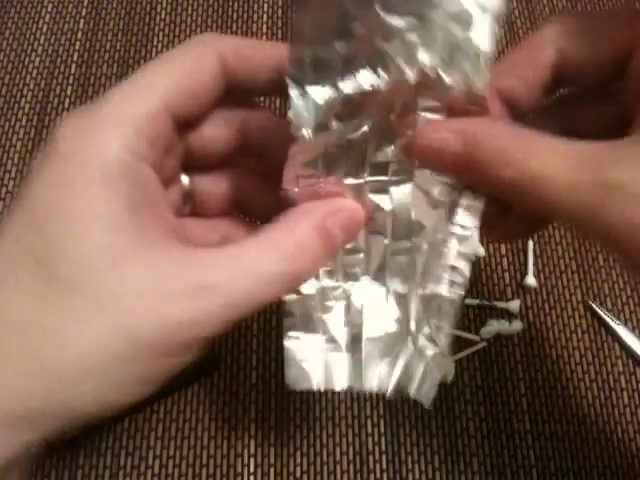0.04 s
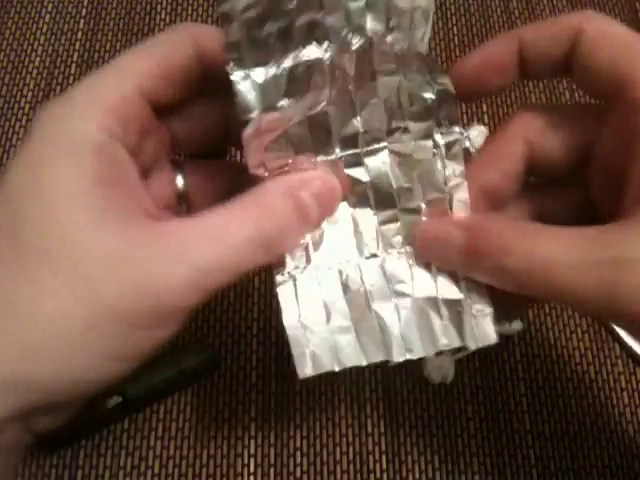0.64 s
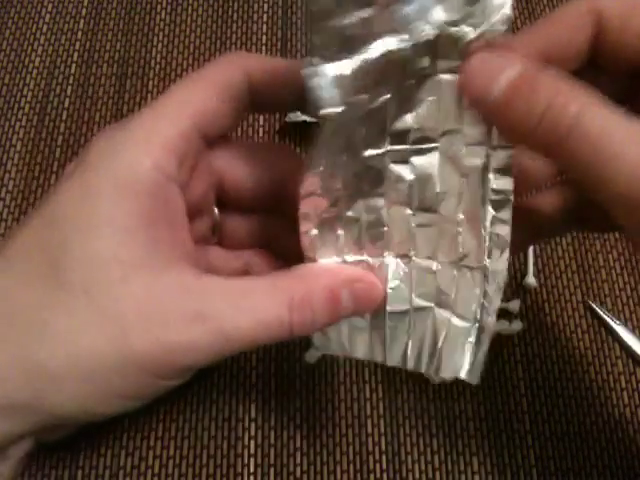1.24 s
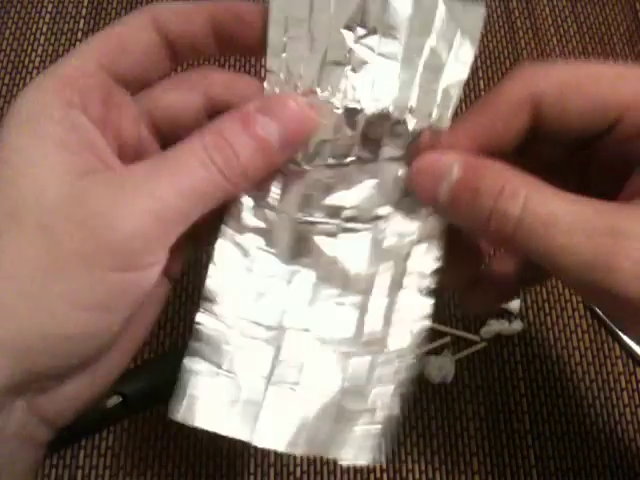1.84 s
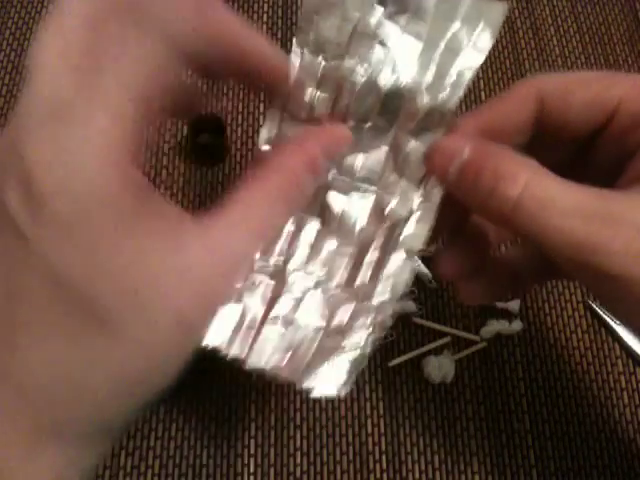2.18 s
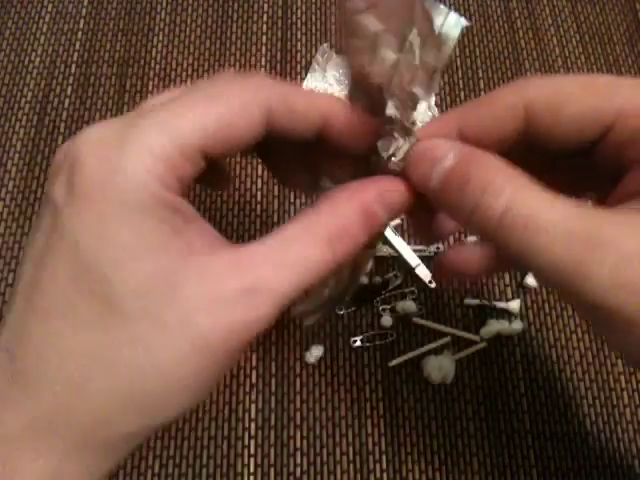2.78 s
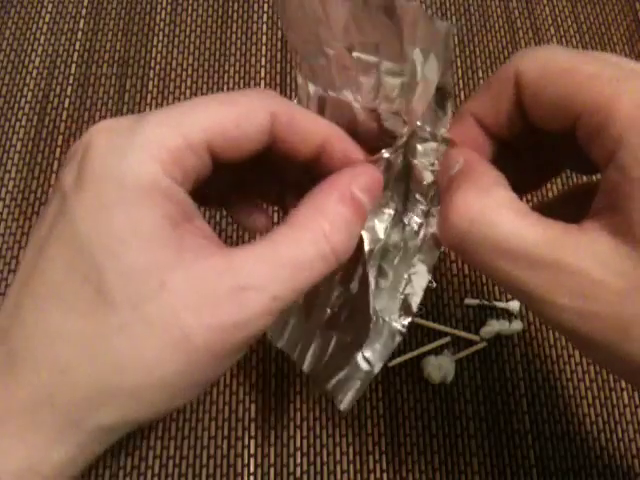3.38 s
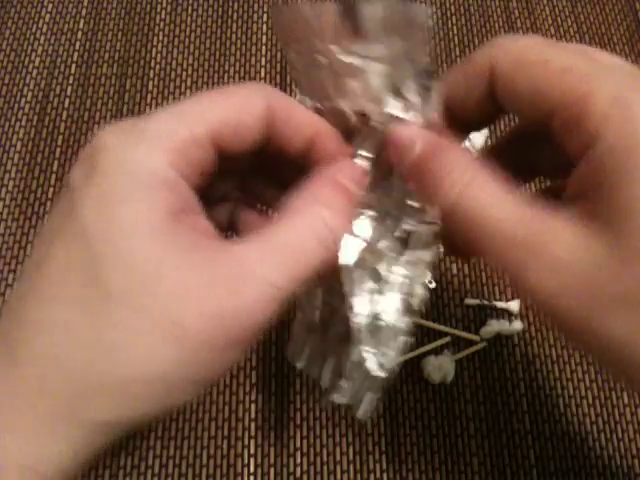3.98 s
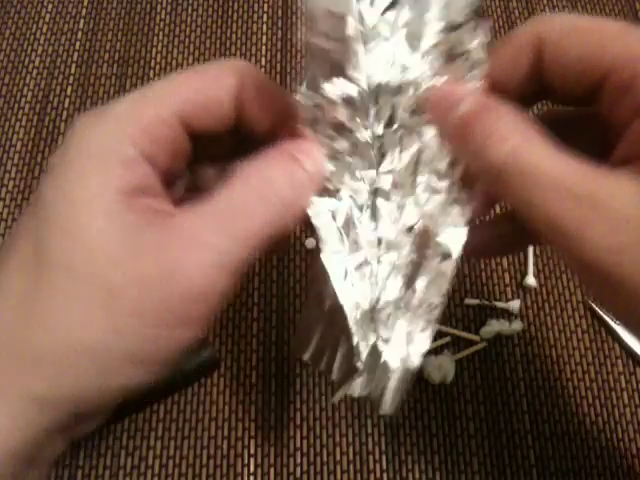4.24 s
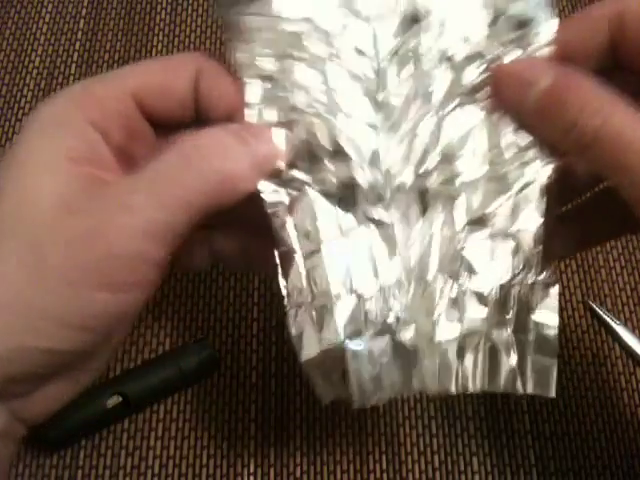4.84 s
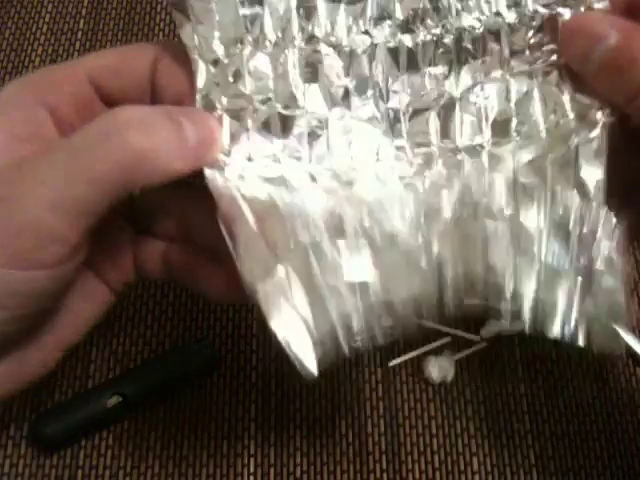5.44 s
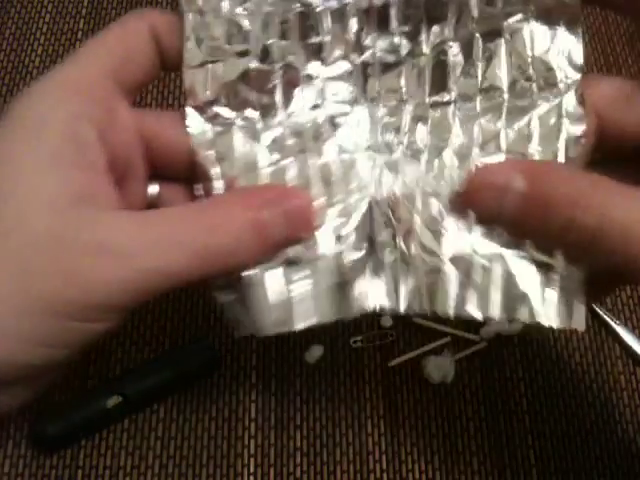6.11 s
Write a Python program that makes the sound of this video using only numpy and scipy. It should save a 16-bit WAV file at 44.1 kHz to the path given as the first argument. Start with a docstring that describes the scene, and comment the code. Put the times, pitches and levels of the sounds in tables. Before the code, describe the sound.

Close, crisp crackling and sharp snaps of creased aluminium foil being opened by hand in a small room with a faint hum.

```python
"""A small creased sheet of aluminium foil is slowly unfolded by hand over a table in a small, live room.
Its facets buckle in sharp snaps, tiny creases give way in a fine crackle and fingertips rub the ridges;
now and then the whole sheet flaps softly. The walls throw it all back.
Behind it are room air, the low drone of an appliance and the thin line whistle of a picture tube."""
import sys
import numpy as np
from scipy import signal
from scipy.fft import rfft, irfft, next_fast_len
from scipy.io import wavfile
from scipy.ndimage import map_coordinates

SR = 44100
rng = np.random.default_rng(int(sys.argv[2]) if len(sys.argv) > 2 else 0)


def unload_wav(signal):
    """Save mono or channel-first audio to the path in sys.argv[1] as 16-bit WAV at rate SR, clipped to [-1, 1]."""
    wavfile.write(
        sys.argv[1],
        SR,
        np.round(np.clip(np.atleast_2d(signal).T, -1, 1) * 32767).astype(np.int16),
    )


N = 270333


def amp(db):
    """Decibels to gain."""
    return 10 ** (np.asarray(db) / 20)


def unit(x):
    """x at rms 1."""
    return x / np.sqrt(np.mean(x ** 2) + 1e-20)


def along(points, hz):
    """Read a curve of (Hz, value) breakpoints on a log frequency axis."""
    f, v = np.transpose(points)
    return np.interp(np.log(hz + 1), np.log(f + 1), v)


def filtered(x, response):
    """EQ x with a gain given as a function of frequency."""
    size = next_fast_len(N + SR // 2)
    return irfft(rfft(x, size) * response(np.fft.rfftfreq(size, 1 / SR)), size)[:N]


def causal(db):
    """Minimum-phase responses for rows of dB gains: EQ with no pre-ring."""
    cepstrum = irfft(np.log(amp(db) + 1e-6))
    half = cepstrum.shape[-1] // 2
    cepstrum[..., 1:half] *= 2
    cepstrum[..., half + 1:] = 0
    return np.exp(rfft(cepstrum))


def add(track, s, sound):
    """Mix a sound into the track at time s."""
    part = track[max(round(s * SR), 0):][:len(sound)]
    part += sound[:len(part)]


def facet_ripple(hz, count, spacing_hz):
    """Every facet has its own broad resonances: one random EQ ripple each, within +-1."""
    knots = rng.standard_normal((count, 256))
    rows, places = np.meshgrid(np.arange(count), hz / spacing_hz, indexing="ij")
    return np.tanh(map_coordinates(knots, [rows, places], mode="mirror"))


def grains(spectrum, scatter_db, t60, count, size=1280):
    """A stream of tiny ticks of uneven size and colour, at rms 1."""
    t, hz = np.arange(size) / SR, np.fft.rfftfreq(size, 1 / SR)
    starts = (np.arange(count) + rng.uniform(-2, 2.4, count)) * N / SR / count
    gains = amp(scatter_db * np.minimum(rng.exponential(size=(count, 1)), np.pi))
    bursts = gains * amp(-60 * t / t60) * rng.standard_normal((count, size))
    colours = causal(along(spectrum, hz) + 7 * facet_ripple(hz, count=120, spacing_hz=500))
    ticks = irfft(rfft(bursts) * colours[rng.integers(len(colours), size=count)])
    track = np.zeros(N)
    for start, tick in zip(starts, ticks):
        add(track, start, tick)
    return unit(track)


# room tone EQ: f/Hz, relative level/dB
AIR_EQ = [(25, -43), (70, -34), (110, -14), (150, 4), (260, 0), (330, -3), (450, -15), (800, -19.5),
          (2000, -23.5), (6000, -28.5), (14000, -24), (17000, -69)]

def room_air(level_db=-64.5):
    """The room's air: a soft, low bed of noise with a faint hiss on top."""
    return amp(level_db) * unit(filtered(rng.standard_normal(N), lambda hz: amp(along(AIR_EQ, hz))))


# resonances of the appliance's casing: f/Hz, half-width/Hz, relative level/dB
CASING_MODES = [(146.7, 13.6, -8), (172.5, 8.1, -13.5), (199.3, 11, 2.5)]

def appliance_drone(level_db=-59.0):
    """Noise in a few narrow resonances of the casing makes a fluttering drone."""
    def casing(hz):
        return sum(amp(db) / (1 + ((hz - centre) / width) ** 2) for centre, width, db in CASING_MODES)
    return amp(level_db) * unit(filtered(rng.standard_normal(N), casing))


def tube_whistle(hz=15733.6, level_db=-54.5, drift_db=-0.5, waver_db=1.3):
    """The picture tube's line whistle: a thin sine whose level drifts slowly and wavers a little."""
    t = np.arange(N) / SR
    drift = map_coordinates(rng.standard_normal(128), [2 * t], mode="mirror")
    waver = map_coordinates(rng.standard_normal(128), [14 * t], mode="mirror")
    return amp(level_db + drift_db * drift + waver_db * waver) * unit(np.sin(2 * np.pi * hz * t))


def finger_effort(idle_db=-73.5, work_db=-44.5, follow=0.59, build_s=0.021, relax_s=0.02):
    """Crackle envelope: faint while the sheet is held, it builds up to each snap and relaxes after it."""
    t = np.arange(0, N / SR, .002)
    s, db = np.transpose(SNAP_CUES)[:2, :, None]
    swells = amp(work_db + follow * db) * np.exp(-np.maximum((s - t) / build_s, (t - s) / relax_s))
    return np.interp(np.arange(N) / SR, t, amp(idle_db) + np.linalg.norm(swells, axis=0))


# EQ of the tiny creases: f/Hz, relative level/dB
CRACKLE_EQ = [(150, -5), (400, -6.5), (1000, -2), (2000, -1), (4500, 7.5), (8000, 4), (13000, -11),
              (16500, -42), (19000, -58)]

def crackle(cracks, level_db=-3, ticks_db=-7, settle_db=-15, settle_s=0.024):
    """Tiny creases give way as the fingers work, and in a flurry as the sheet settles after each snap."""
    effort = finger_effort()
    pole = np.exp(-1 / (settle_s * SR))
    strain = np.sqrt(np.abs(signal.lfilter([1 - pole], [1, -pole], cracks ** 2)))  # envelope follower
    envelope = amp(level_db) * effort + amp(settle_db) * strain
    fine = envelope * grains(CRACKLE_EQ, scatter_db=4.5, t60=0.03, count=2600)
    # lesser facets tick on their own
    ticks = amp(ticks_db) * effort * grains(FACET_EQ, scatter_db=6.0, t60=0.0088, count=420)
    return fine + ticks


# fingertip strokes: centre t/s, length/s, relative level/dB
RUB_CUES = [(0.057, 0.037, -58), (0.408, 0.04, -54), (0.64, 0.15, -72), (0.837, 0.033, -57),
            (1.005, 0.065, -59), (1.213, 0.16, -59.5), (1.484, 0.042, -55), (1.708, 0.07, -58),
            (2.095, 0.11, -55.5), (2.423, 0.16, -62.5), (2.672, 0.23, -64.5), (3.368, 0.13, -61),
            (3.881, 0.099, -49), (4.113, 0.19, -75), (4.943, 0.097, -49), (5.818, 0.091, -47),
            (6.038, 0.077, -49.5)]
# EQ of skin sliding on foil: f/Hz, relative level/dB
RUB_EQ = [(100, -23), (400, -3), (950, -2.5), (1500, -7.5), (2400, -4), (4000, -6), (9000, -8),
          (18000, -38)]

def rubs(level_db=-3):
    """Skin catches and slips on the ridges: dense, duller grains that swell and fade with each stroke."""
    t = np.arange(N) / SR
    pressure = sum(amp(db) * np.exp(-(2 * (t - s) / length) ** 2) for s, length, db in RUB_CUES)
    return amp(level_db) * pressure * grains(RUB_EQ, scatter_db=0.5, t60=0.017, count=3600)


# buckling facets: t/s, relative level/dB, body/dB, brightness/dB, main mode f/Hz
SNAP_CUES = [(0.0735, -37, -32, -8.5, 6020), (0.0905, -33.5, -52, -19, 5660), (0.1263, -38, -33, -14, 3270),
             (0.256, -35, -25, -11.5, 7600), (0.4397, -38.5, -17, -4, 5120), (0.4456, -36.5, -18, -4, 8120),
             (0.4524, -33, -36, -10, 6500), (0.4747, -39, -30.5, -9, 5060), (0.599, -47.5, -10, -7, 865),
             (0.6735, -44.5, -40, -6, 5570), (0.7055, -44, -42, -14, 4000), (0.8377, -36, -14, -22, 950),
             (1.0075, -42, -7, -13, 990), (1.0168, -32, -13.5, -22, 886), (1.064, -41.5, -14, -7.5, 7980),
             (1.1733, -42, -16, -19, 1920), (1.2193, -41, -13, -4, 8150), (1.3073, -30, -40, -21.5, 6140),
             (1.635, -44, -15.5, -31, 5200), (1.6986, -37, -18, -23, 1850), (1.7535, -44, -8, -7, 7300),
             (2.0895, -40, -23, -12.5, 5100), (2.134, -37, -7, -35, 1940), (2.1919, -45, -17.5, -9, 3340),
             (2.3276, -46.5, -1.5, -38, 1040), (2.6899, -43, -32, -9, 5330),
             (2.9255, -25, -28, -10.5, 4600), (3.0083, -37.5, -30, -5, 7500), (3.018, -33, -35, -8.5, 4720),
             (3.1986, -46.5, -32, -17, 6100), (3.2607, -26, -17.5, -8, 6650), (3.2755, -26, -24, -10, 7790),
             (3.2841, -20, -24, -4.5, 5870), (3.3524, -40, -23, -4, 4460), (3.3622, -36.5, -14, -5, 6200),
             (3.5877, -39.5, -60, -12, 4900), (3.6239, -39.5, -37, -4.5, 8620),
             (3.645, -34.5, -20, -13, 4850), (3.6643, -34, -29, -3, 7480), (3.8207, -38, -17, -9, 5560),
             (3.8508, -39.5, -2.5, -4.5, 8390), (3.8812, -28, -24.5, -6, 4470),
             (3.9254, -38, -29.5, -13, 4400), (3.99, -34.5, -51, -10, 6800), (4.0678, -18, -12, -6.5, 5030),
             (4.0847, -15, -21, -17.5, 4900), (4.128, -17, -21, -12, 4370), (4.156, -21.5, -28, -18, 2020),
             (4.1884, -25, -44, -11.5, 6250), (4.2377, -20, -14, -12, 1890), (4.2661, -27.5, -30, -3, 7070),
             (4.3475, -33.5, -22.5, -3, 7000), (4.367, -25.5, -11, -5.5, 6860),
             (4.3763, -23, -17.5, -19, 4160), (4.5213, -30.5, -46, -22, 5630),
             (4.5744, -28, -24, -13, 3600), (4.5808, -12.5, -26.5, -14, 5020), (4.593, -30, -24, -5, 7860),
             (4.6213, -12.5, -22.5, -23, 1140), (4.6353, -18, -22, -15, 4960), (4.691, -32, -29, -14, 6200),
             (4.7492, -26.5, -19, -25, 3100), (4.775, -23, -21, -9, 5300), (4.81, -15, -19, -6.5, 3610),
             (4.8137, -18.5, -23, -10, 3930), (4.8204, -17, -18, -20, 4270),
             (4.8701, -24, -21.5, -21, 1700), (4.8998, -30, -13, -10, 1890),
             (4.9418, -29.5, -14, -6.5, 6420), (4.9745, -18, -12.5, -9, 3740),
             (4.988, -26.5, -20.5, -15, 7330), (5.0414, -19, -21, -9.5, 1650),
             (5.1772, -30.5, -22, -13.5, 3710), (5.2592, -22, -24, -3, 8300), (5.2643, -25, -24, -16, 3460),
             (5.2968, -34.5, -10, -5, 8400), (5.3632, -39, -38, -15, 5850), (5.4352, -41.5, -39, -2, 8200),
             (5.5821, -25, -18, -14, 9500), (5.749, -36.5, -10, -14, 3340), (5.8165, -29.5, -23, -7, 5420),
             (5.9827, -33.5, -16, -17, 6150), (6.0325, -35.5, -19, -15, 3800), (6.0907, -31, -33, -9, 7000)]
# EQ of a middling facet: f/Hz, relative level/dB
FACET_EQ = [(25, -20), (80, -36), (200, -16.5), (600, -9), (1170, -6.5), (1450, -7.5), (2000, -2.5),
            (2600, -4.5), (5000, -2), (6000, -4), (8300, -9), (12000, -17), (16200, -22.5), (19000, -46)]

def snaps(level_db=-11, rise_s=0.00015, crack_t60=0.0016, ring_db=-10, ring_t60=0.019,
          sheet_db=-23, sheet_t60=0.049, flat_at_s=5.5, flat_stretch=2.65, cue_delay_s=0.0006, size=4096):
    """A facet flips with a crack, rings for some milliseconds and shakes the rest of the sheet."""
    t, hz = np.arange(size) / SR, np.fft.rfftfreq(size, 1 / SR)
    s, db, body_db, bright_db, mode_hz = np.transpose(SNAP_CUES)[:, :, None]
    body_db, bright_db = body_db + 22.5, bright_db + 18  # relative to a middling facet
    # bright facets ring longer, and so does the sheet once it is spread flat
    t60 = ring_t60 * 2 ** (bright_db / 20) * np.where(s > flat_at_s, flat_stretch, 1)
    t60 *= np.exp(0.079 * rng.standard_normal(s.shape))
    decay = amp(-60 * t / crack_t60) + amp(ring_db - 60 * t / t60) + amp(sheet_db - 60 * t / sheet_t60)
    burst = decay * (1 - np.exp(-t / rise_s)) * rng.standard_normal((len(s), size))
    # large facets sound hollow, small ones bright
    low_shelf = body_db * along([(450, 0.67), (950, 1.05), (2400, 0)], hz)
    high_shelf = bright_db * along([(5000, 0.055), (9500, 0.95)], hz)
    # one well damped mode stands out above the facet's other resonances
    mode = 7.5 / (1 + ((hz - mode_hz) / (120 + .015 * mode_hz)) ** 2)
    ripple = 3.5 * facet_ripple(hz, count=len(s), spacing_hz=400)
    spectra = rfft(burst) * causal(along(FACET_EQ, hz) + low_shelf + high_shelf + mode + ripple)
    # each snap is levelled by the mid-band punch of its first 3.5 ms
    attack = irfft(spectra * ((hz > 1500) & (hz < 7000)))[:, :155]
    sounds = irfft(spectra) * amp(db + level_db) / attack.std(axis=1, keepdims=True)
    track = np.zeros(N)
    for start, sound in zip(s[:, 0], sounds):
        add(track, start + cue_delay_s, sound)  # each snap sounds 0.6 ms after its cue time
    return track


# flexes of the whole sheet: t/s, level/dB, f/Hz
FLAP_CUES = [(1.014, -43.5, 317), (4.069, -44, 320), (4.812, -37, 422), (4.977, -48, 410), (5.57, -37, 340),
             (5.749, -48, 498), (6.041, -42, 216)]

def flaps(t60=0.053, attack_s=0.00064, upper_ratio=1.494, upper_db=-5, puff_db=-12, puff_s=0.00064):
    """The bending sheet pushes a puff of air and gives a soft pop with two quickly damped modes."""
    t, track = np.arange(SR // 4) / SR, np.zeros(N)
    puff = amp(puff_db) * (1 - t / puff_s) * np.exp(-t / puff_s)
    fade_in = 1 - np.exp(-t / attack_s)
    for s, db, hz in FLAP_CUES:
        modes = np.sin(2 * np.pi * hz * t) + amp(upper_db) * np.sin(2 * np.pi * hz * upper_ratio * t)
        add(track, s, amp(db) * (puff + modes * amp(-60 * t / t60)) * fade_in)
    return track


# reverb decay of the room: f/Hz, t60/s
ROOM_DECAY = [(300, 0.28), (800, 0.24), (2000, 0.21), (5500, 0.22), (10000, 0.28), (16000, 0.34)]
# EQ of the wall reflections: f/Hz, relative level/dB
WALL_EQ = [(300, -3.5), (1000, -4), (2200, -2.5), (4000, -5), (7000, -5.5), (15000, -9.5)]

def reverb(x, wet_db=-5.5, predelay_s=.004, blocks=24):
    """The walls answer within milliseconds; the sheet moves, so each block of sound gets a fresh tail."""
    wet = np.zeros(N)
    for block in np.array_split(np.arange(N), blocks):
        hz, t, noise = signal.stft(rng.standard_normal(SR // 3), SR, nperseg=256)
        decay = amp(-60 * t / along(ROOM_DECAY, hz)[:, None])
        tail = signal.istft(noise * decay, SR, nperseg=256)[1]
        add(wet, block[0] / SR + predelay_s, signal.fftconvolve(x[block], tail / np.linalg.norm(tail)))
    return amp(wet_db) * filtered(wet, lambda hz: amp(along(WALL_EQ, hz)))


def scene():
    """Mono mix: the foil up close, its reverb, and the steady bed behind."""
    cracks = snaps()
    foil = cracks + crackle(cracks) + rubs() + flaps()
    # the back of the sheet radiates each snap with another fine spectrum, heard only off the walls
    reflections = reverb(foil) + amp(-6.5) * reverb(snaps())
    bed = room_air() + appliance_drone() + tube_whistle()
    return (foil + reflections + bed)[None]


def record(dry):
    """A brick-wall high cut at 19.3 kHz."""
    return np.array([filtered(channel, lambda hz: hz < 19300) for channel in dry])


dry = scene()
out = record(dry)
unload_wav(out)
```